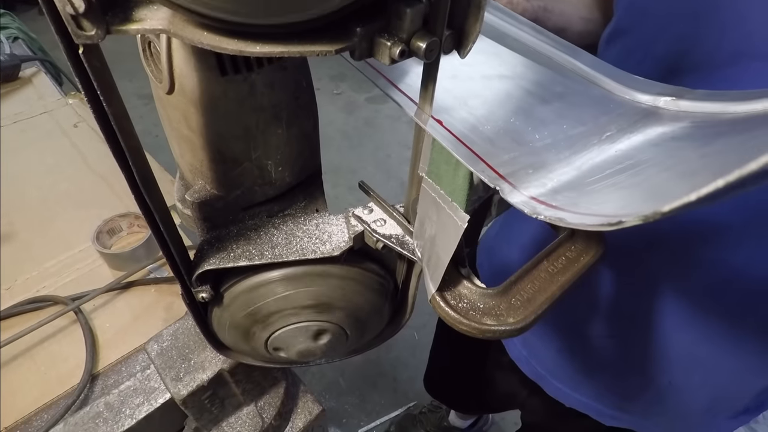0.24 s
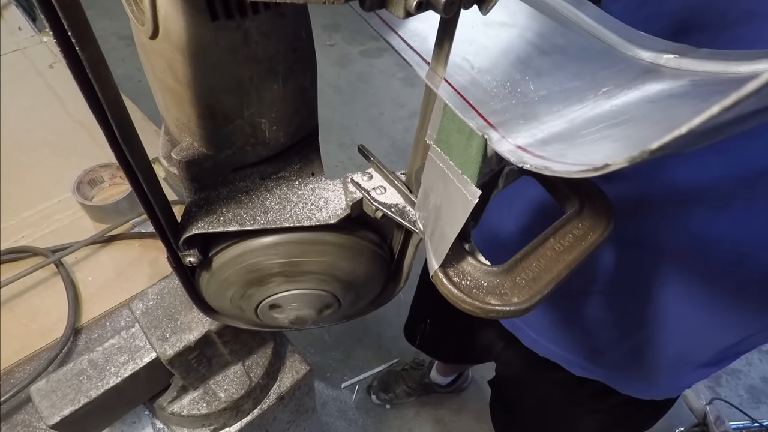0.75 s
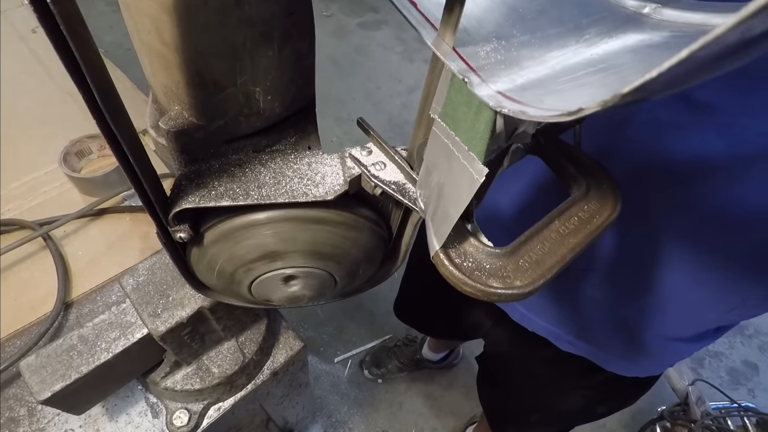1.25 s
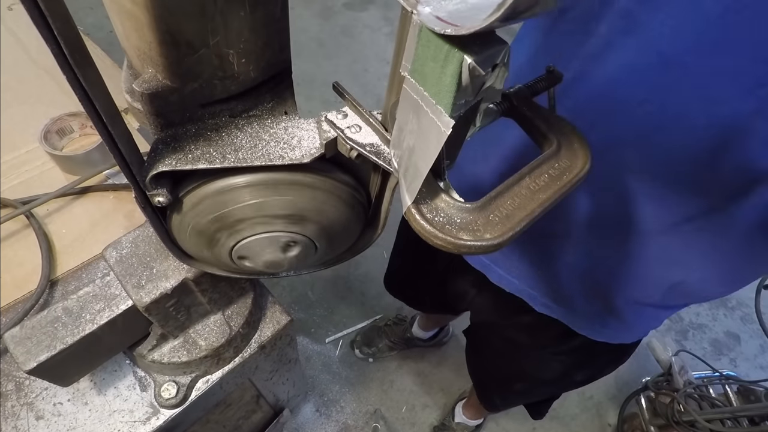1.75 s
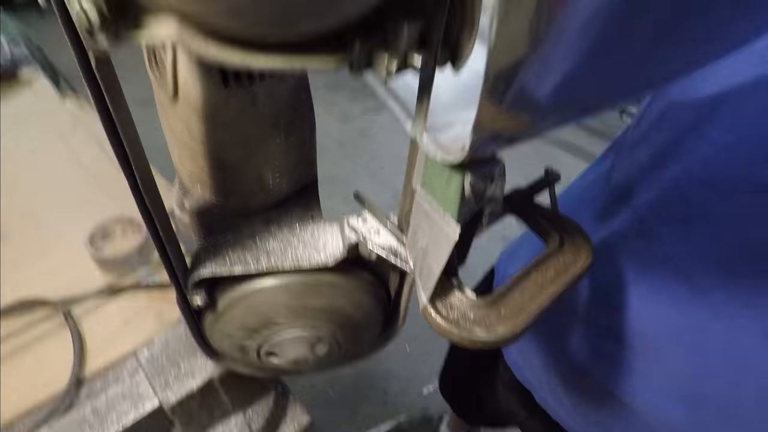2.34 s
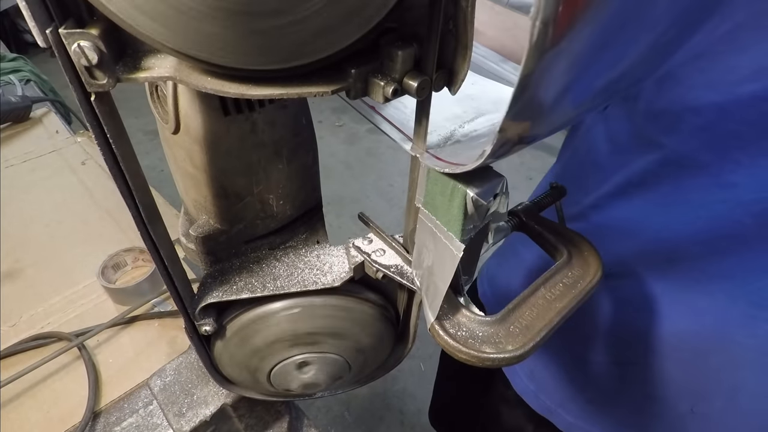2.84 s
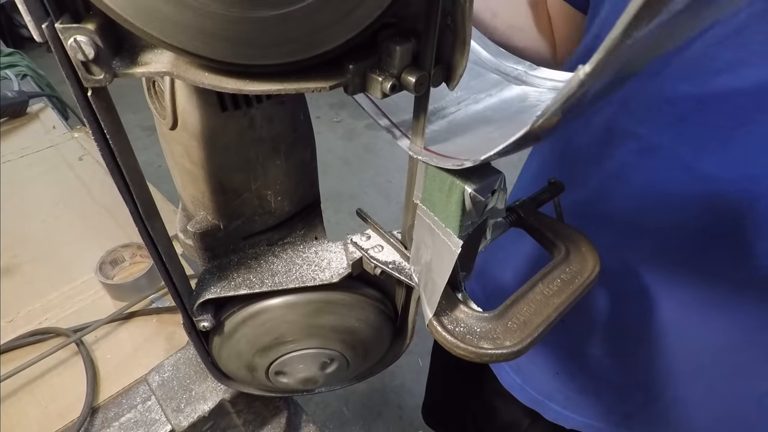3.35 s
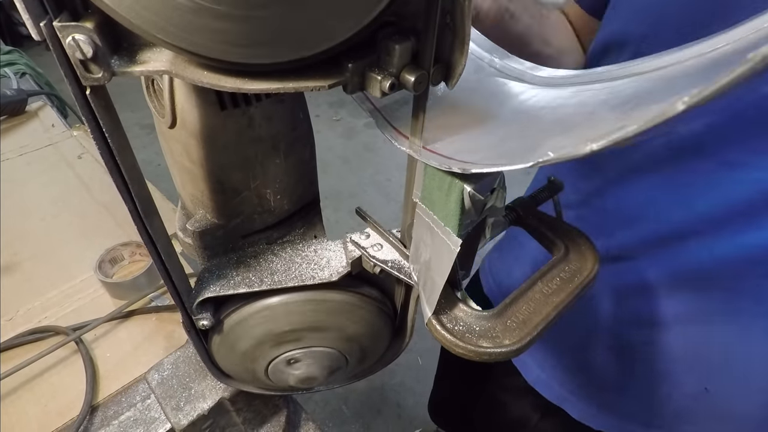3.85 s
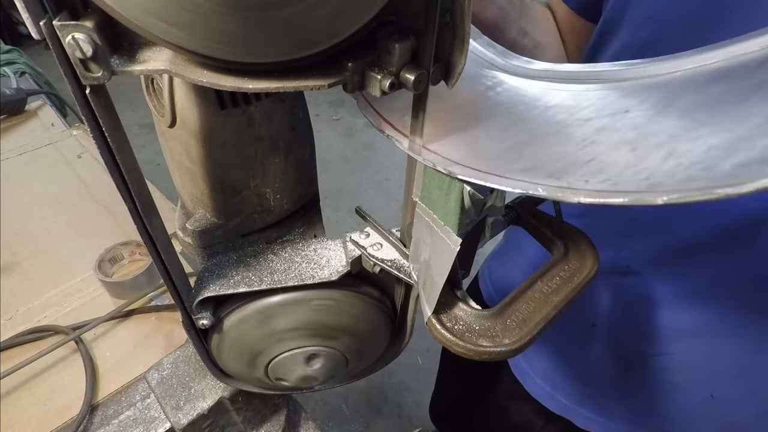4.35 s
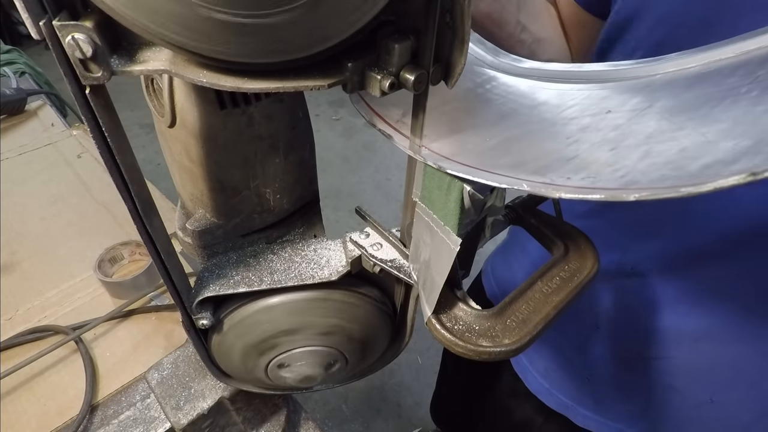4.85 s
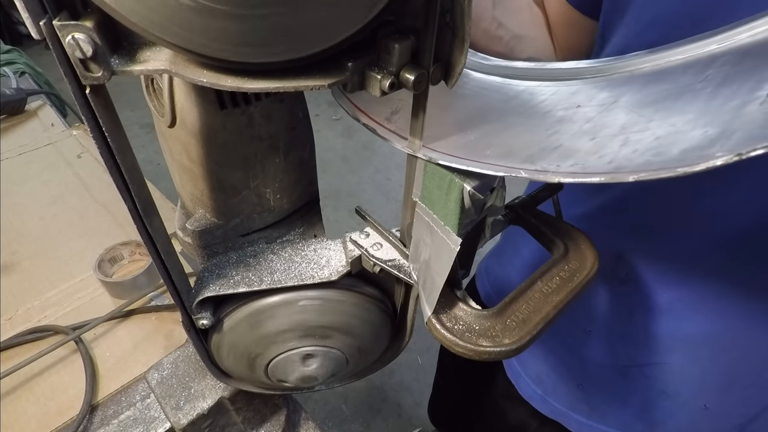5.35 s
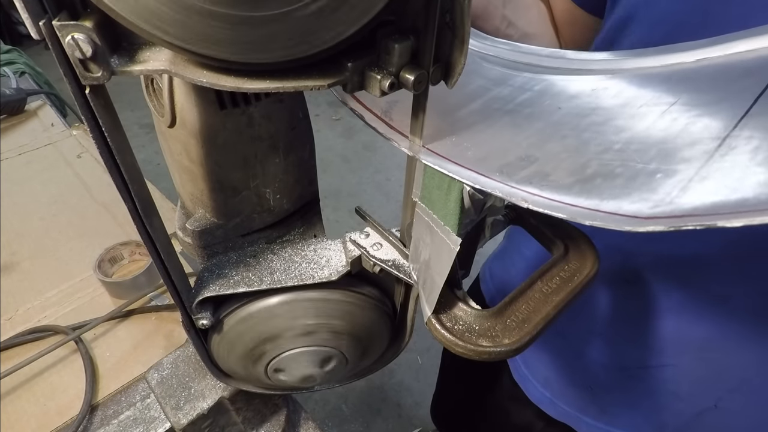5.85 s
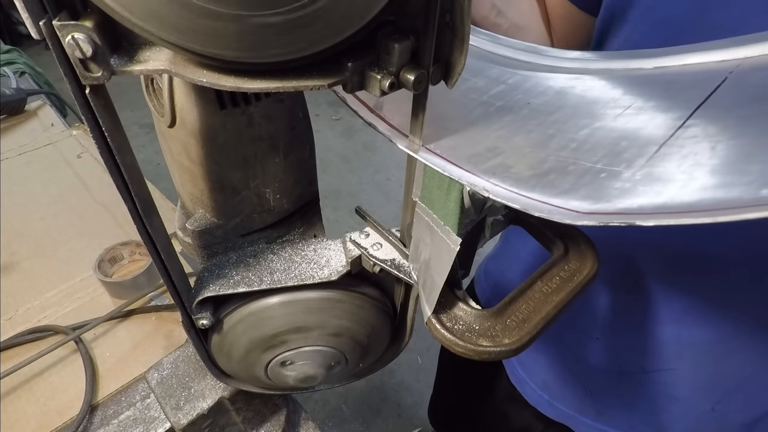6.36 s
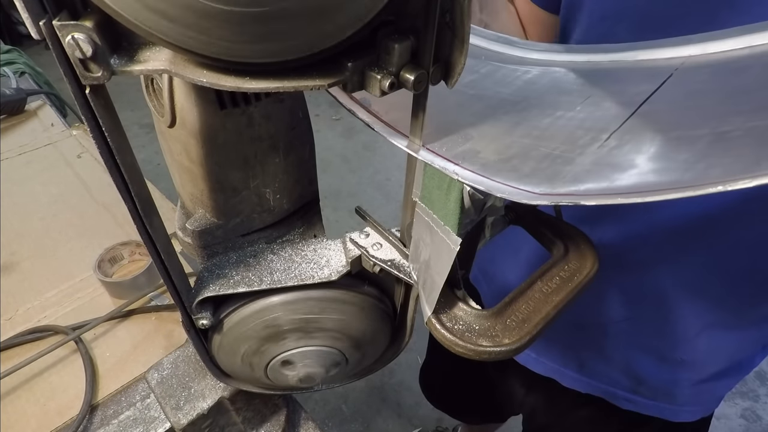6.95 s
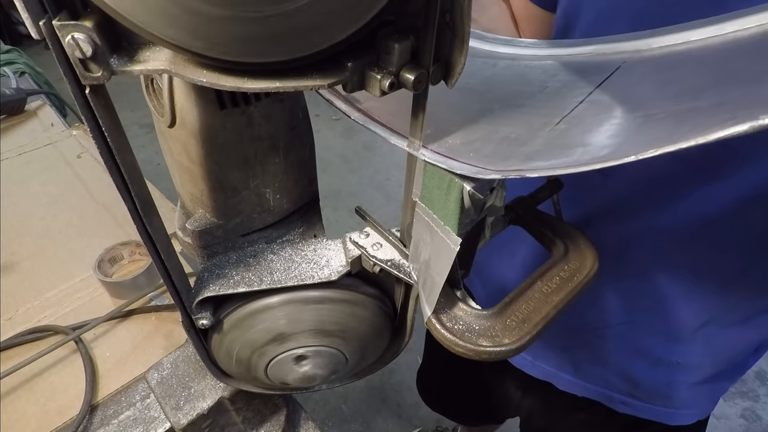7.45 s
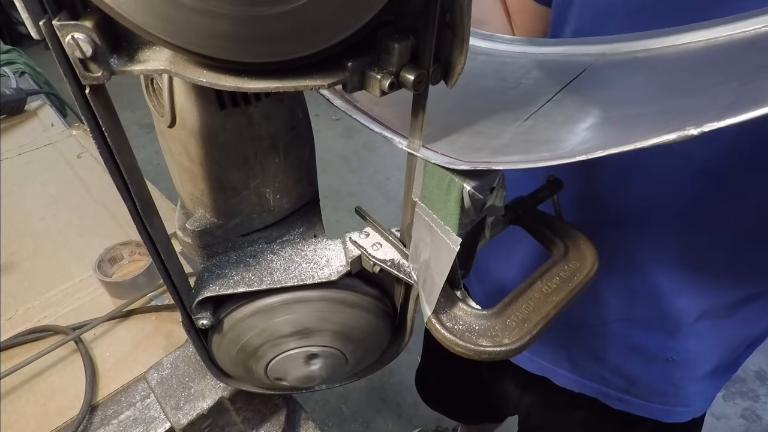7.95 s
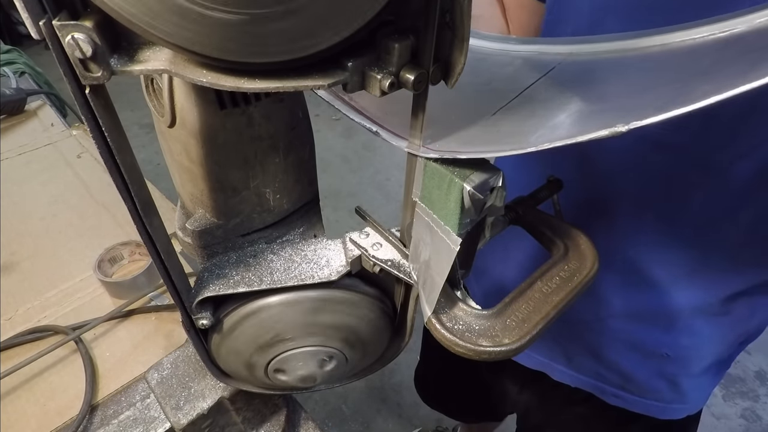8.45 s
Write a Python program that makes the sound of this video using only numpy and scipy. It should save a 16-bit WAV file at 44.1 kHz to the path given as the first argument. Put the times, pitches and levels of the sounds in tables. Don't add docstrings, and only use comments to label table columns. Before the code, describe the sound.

A band saw trims a curved metal sheet up close: harsh steady hiss, thin motor whine, a few dull bumps, brief metallic ringing.

```python
import sys
import numpy as np
from scipy import signal
from scipy.io import wavfile
from scipy.ndimage import uniform_filter1d

SR = 44100
rng = np.random.default_rng(int(sys.argv[2]) if len(sys.argv) > 2 else 0)


def boost(x):
    u = np.asarray(x, float) / 20
    return 10 ** u


def inscribe(sig):
    pcm = np.round(np.clip(np.atleast_2d(sig).T, -1, 1) * 32767)
    wavfile.write(sys.argv[1], SR, pcm.astype(np.int16))


N = 383669
SIZE, HOP, STEP = 1024, 256, 32
ONE_PORT_UNTIL = (2.62, 2.74)  # s, the second port fades in


def evened(x):
    return x / np.sqrt(np.mean(x ** 2) + 1e-20)


def read(points, hz):
    f, value = np.transpose(points)
    return np.interp(np.log(hz + 1), np.log(f + 1), value)


def ramp(t, t0, t1):
    return np.clip((t - t0) / (t1 - t0), 0, 1)


def spells(t, rows, fade_s=.05):
    return sum(size * ramp(t, t0, t0 + fade_s) * (1 - ramp(t, t1 - fade_s, t1)) for t0, t1, size in rows)


def wander(count, seconds):
    rows = rng.standard_normal((count, N // 1024 + 2))
    length = int(seconds * SR / 1024) + 1
    rows = uniform_filter1d(uniform_filter1d(rows, length), length)
    points = np.arange(0, N, STEP) / 1024
    return np.array([np.interp(points, np.arange(len(row)), evened(row)) for row in rows])


def patches(shape, bins, frames):
    bins, frames = max(int(bins), 1), max(int(frames), 1)
    field = uniform_filter1d(rng.standard_normal(shape), bins, -2)
    for _ in range(2):
        field = uniform_filter1d(field, frames, mode="wrap")
    return evened(field)


def two_ports(t):
    return ramp(t, *ONE_PORT_UNTIL)


# (pitch [Hz], left minus right [dB])
PORT_GAP = [(60, 6), (120, -3), (240, 9), (470, 8), (940, 0.5), (1880, 1), (3730, -1.5), (7430, 3.5),
            (14800, -5)]


def port_gap_db(hz):
    return read(PORT_GAP, hz)


# (change begins [s], change ends [s])
STAGES = [
    (1.54, 1.6),
    (2.68, 2.75),
]


def stage_changes(t):
    return [ramp(t, *stage) for stage in STAGES]


def staged(t, pressed, free, long):
    to_free, to_long = stage_changes(t)
    return pressed + (free - pressed) * to_free + (long - free) * to_long


def swings(rows):
    out, t = np.zeros(N), np.arange(SR // 4) / SR
    for s, db, hz, t60 in rows:
        swing = boost(db - 2.0 - 60 * t / t60) * np.sin(2 * np.pi * hz * t)
        part = out[round(s * SR):][:len(t)]
        part -= swing[:len(part)]
    return out


# (time [s], peak level [dB], pitch [Hz], minus for an outward push, t60 [s])
KNOCKS = [(1.51, -22, 540, 0.1), (1.516, -23, -110, .05), (1.5295, -12.5, 170, 0.03),
          (1.543, -24, -90, 0.04), (1.57, -22, -42, 0.12), (1.8885, -13, 160, 0.02),
          (1.9405, -15, 170, 0.012), (1.944, -18.5, -62, 0.06), (1.999, -25, 70, .05),
          (2.055, -27, 80, .04), (2.07, -25, -90, 0.04), (2.193, -21, 110, 0.04), (2.329, -20, 70, 0.05),
          (2.343, -21, -65, .05), (2.359, -22.5, 105, 0.06), (2.382, -25, 85, .06), (2.407, -28, -80, .04),
          (2.437, -28, 80, 0.042)]


def knocks():
    return swings(KNOCKS)


# (from [s], to [s],
# level change [dB])
RUMBLE_SHIFTS = [(.1, .3, -4), (.5, .64, 6), (.9, 1.451, 0), (2.62, 3.2, -4), (2.7, 3.05, -2.5), (3.28, 3.5, 2),
                 (3.65, 4.0, 2.5), (4.2, 4.5, 3), (4.5, 4.72, -3), (4.88, 5.2, 5.5), (5.28, 5.42, -6),
                 (5.95, 6.2, 1), (6.75, 7.02, 3), (7.25, 7.9, 5), (7.98, 8.9, 4)]


def shake_db(t, feed_db):
    steady_db = feed_db + staged(t, pressed=-13.5, free=-22, long=-26.5)
    power = boost(steady_db + spells(t, RUMBLE_SHIFTS, fade_s=0.11)) ** 2
    aftershake_db, aftershake_t60 = -20.5, 0.49
    for s, db, _, _ in KNOCKS:
        fall_db = 60 * np.maximum(t - s, 0) / aftershake_t60
        power += (t >= s) * boost(db + aftershake_db - fall_db) ** 2
    return 10 * np.log10(power)


# (peak time [s], half length [s], rise [Hz])
EASES = [(.02, .3, 3.2), (.4, .75, 1.1), (1.79, .2, 1.7), (1.98, .05, 1.2), (4.17, .05, 2), (6.8, .08, 1),
         (.52, .14, 2.2), (.9, .3, 1.7), (1.47, .15, 2.2), (1.7, .17, 3.6), (1.9, .17, 3.2),
         (2.77, .21, 6.2), (3.08, .17, 2.2), (3.61, .13, 3), (3.87, .15, 2.2), (4.1, .15, 4.2),
         (4.41, .1, 1.5), (4.58, .13, 4), (4.81, .14, 2.6), (5.03, .1, -3.4), (5.15, .09, 3.4),
         (5.31, .12, 4), (5.65, .14, 2.6), (5.91, .13, 3.8), (6.72, .22, 4), (7.35, .4, -.5),
         (7.9, .22, 1.3), (8.6, .16, -1.6)]


def shaft_angle(t, fine):
    loaded_hz = 297.9
    speed = loaded_hz + sum(rise * np.maximum(1 - abs(t - s) / half, 0) for s, half, rise in EASES)
    return 2 * np.pi * np.cumsum(np.interp(fine, t, speed)) / SR


WHINES = (1, 9, 15)
# (pressed level [dB], free level [dB], long cut level [dB])
WHINE_DB = [(-46.5, -47.5, -60.5), (-39.5, -47, -41), (-46.5, -34, -39)]
# (from [s], to [s], level change [dB])
SWELLS = [
    [(-.2, .52, 5), (1.55, 1.9, -2.5), (4.38, 4.8, -4), (7.22, 8.32, 4.5)],
    [(-.2, .3, -2.5), (.45, .68, 1.5), (1.1, 1.42, 0.5), (1.54, 1.63, -1), (1.64, 1.93, 6.5),
     (2.14, 2.32, 5), (2.32, 2.44, -4), (2.6, 2.7, -8), (2.72, 2.98, -3.5), (2.96, 3.5, -4), (4.18, 4.3, 0),
     (3.52, 3.72, 3), (5.18, 5.42, -2.5), (6.6, 6.84, 1.5), (6.84, 7.1, 0), (8.3, 8.36, -6),
     (4.93, 5.14, -3), (5.4, 5.66, -1.5), (4.34, 4.76, -1), (5.98, 6.26, 0), (7.3, 8.0, 0.5),
     (8.09, 8.33, 2)],
    [(-.2, .12, 5.5), (.4, .92, -2), (1.0, 1.38, 1), (1.83, 2.14, -7), (2.375, 2.475, -24), (4.12, 4.22, 2),
     (4.22, 4.32, -4), (5.9, 6.22, 1.5), (7.88, 8.1, -0.5), (2.7, 2.98, -5), (4.93, 5.11, -2),
     (5.4, 5.56, 0), (6.22, 6.76, -1), (6.78, 7.72, -5), (6.95, 7.3, -9), (7.7, 8.9, -2), (8.23, 8.47, 0.5),
     (8.47, 8.9, 0)],
]


def whine_levels(t, angle):
    gain = {}
    for k, stage_db, swells in zip(WHINES, WHINE_DB, SWELLS):
        gain[k] = boost(staged(t, *stage_db) + spells(t, swells, fade_s=0.027))
    wheel_per_turn = .05965
    depth = staged(t, pressed=.15, free=.25, long=.36)
    gain[9] = gain[9] * (1 + depth * np.cos(wheel_per_turn * angle - .2))
    return gain


# (from [s], to [s], share of a half turn [0-1])
OPPOSED = [
    [(2.72, 3.15, 0.62), (4.4, 5.05, .5), (5.35, 5.47, 0.5), (5.85, 6.2, 0.7), (6.72, 6.9, 0.6),
     (8.3, 8.5, 0.3)],
    [(2.7, 8.9, .17), (3.0, 3.5, .15), (3.19, 3.5, .48), (3.8, 3.9, .25), (4.08, 4.18, .25),
     (4.36, 5.66, .22), (4.55, 4.62, .55), (4.73, 5.14, .4), (5.2, 5.38, .1), (5.35, 5.62, .2),
     (5.76, 5.94, .12), (6.04, 6.07, .6), (6.14, 6.16, .6), (6.22, 7.33, .25), (6.24, 6.6, .3),
     (6.4, 6.58, .12), (6.85, 7.09, .25), (7.9, 8.9, .2), (8.0, 8.11, .6), (8.31, 8.9, .38),
     (8.44, 8.9, .22)],
    [(2.7, 8.9, .18), (3.54, 5.58, .3), (4.46, 4.56, -.2), (4.62, 4.92, .2), (4.98, 5.46, .27),
     (5.02, 5.2, .22), (5.46, 5.58, -.12), (5.86, 5.95, .15), (6.24, 6.68, .3), (6.31, 6.61, .36),
     (6.8, 8.9, .3), (7.98, 8.26, .18), (8.09, 8.26, .3), (8.26, 8.45, -.33), (8.45, 8.9, .33)],
]


def whine_lags(t):
    return {k: np.pi / 2 * spells(t, rows, fade_s=0.0037) for k, rows in zip(WHINES, OPPOSED)}


GEARS = [12, 19.03, 19.47, 21.28, 16.36, 27.1, 30, 31.4, 32.19, 35.35, 45]
GEARS_DB = [-53, -52, -50.5, -51, -60, -59, -57, -58, -57.5, -63, -80]


def gear_levels(t, drifts):
    muffle_db = -9 * (1 - ramp(t, 0.99, 1.6))
    return {k: boost(db + drift + muffle_db) for k, db, drift in zip(GEARS, GEARS_DB, drifts)}


# (multiple of tooth rate [ratio], level [dB])
TEETH_DB = [(2, -71), (3, -68), (4, -67), (5, -61.5), (6, -56.5), (8, -58.5), (9, -51.5)]
# (from [s], to [s], multiple of tooth rate [ratio], level [dB])
BITES = [(.3, .72, 4, -41.5), (.66, 1.02, 4, -36), (0, .5, 2, -45), (.52, .7, 2, -40), (1.07, 1.18, 3, -37),
         (.7, 1.1, 5, -43), (0, .25, 6, -44), (.7, 1.45, 9, -44), (.2, .6, 8, -46), (3.25, 3.75, 3, -51),
         (2.7, 3.02, 2, -58), (4.1, 4.38, 2, -66), (4.2, 4.32, 6, -49), (2.82, 3.16, 9, -51),
         (5.47, 5.6, 6, -47), (7.08, 7.22, 6, -57)]


def tooth_levels(t, drifts):
    teeth = {round(k): boost(db + drift) for (k, db), drift in zip(TEETH_DB, drifts)}
    for t0, t1, k, db in BITES:
        teeth[round(k)] = teeth[round(k)] + boost(db) * np.sin(np.pi * ramp(t, t0, t1)) ** .5
    teeth_per_turn = .8722
    return {k * teeth_per_turn: g for k, g in teeth.items()}


WHINE_FLUTTER = {1: 2, 9: 1.1, 15: 1.4}


def motor(flutter_db=3.0, fade_db=3.0):
    t, fine = np.arange(0, N, STEP) / SR, np.arange(N) / SR
    angle = shaft_angle(t, fine)
    come_and_go = fade_db * wander(count=18, seconds=.07)
    gain = whine_levels(t, angle[::STEP])
    gain.update(gear_levels(t, come_and_go))
    gain.update(tooth_levels(t, come_and_go[::-1]))
    lags = whine_lags(t)
    quick = wander(count=42, seconds=.012)
    slow = wander(count=42, seconds=.2) * two_ports(t)
    out = np.zeros((2, N))
    for i, (k, g) in enumerate(gain.items()):
        slip, apart = (0.78, 0.096) if k in lags else (1.1, 1.1)
        lag = lags.get(k, 0)
        side = apart * np.median(g[len(t) // 2:]) * (.5 * slow[2 * i] + 1j * slow[2 * i + 1])
        side = side + 1j * g * np.sin(lag)
        middle = g * np.cos(lag)
        flutter = boost(WHINE_FLUTTER.get(k, flutter_db) * quick[2 * i + 1])
        waver = np.sqrt(2) * flutter * np.exp(1j * slip * quick[2 * i])
        swing = waver * np.array([middle + side, middle - side])
        swing = np.array([np.interp(fine, t, port) for port in swing])
        out += (swing * np.exp(1j * k * angle)).imag
    return out


# (time [s], peak level [dB], pitch [Hz], t60 [s])
PINGS = [(1.5474, -26, 2170, .04), (1.9689, -28, 2070, .08), (2.108, -22, 3730, .08),
         (2.553, -25, 3660, .08), (2.582, -25, 3660, .08), (2.6559, -24, 1650, .05), (2.7, -27, 1620, .05),
         (3.002, -27, 2380, .08), (3.062, -30, 2370, .12), (4.0008, -28, 2700, .03),
         (5.014, -27, 5990, .02), (5.555, -30, 1560, .08), (6.8335, -22, 7000, .008),
         (7.5055, -20, 3000, .012), (8.5375, -27, 6010, .02)]


def pings():
    return swings(PINGS)


# (pitch [Hz], t60 [s])
SNAG_MODES = [(2300, 0.042), (3300, 0.0092), (3900, 0.0097), (6000, 0.0086), (7200, 0.0045)]


def snags(per_s=60, level_db=-47, spread_db=3.0):
    t, out = np.arange(SIZE) / SR, np.zeros((2, N))
    for hz, t60 in SNAG_MODES:
        force = boost(spread_db * np.minimum(rng.exponential(1, (2, N)), 2.5))
        hits = force * (rng.random((2, N)) < per_s / SR)
        mode = boost(-60 * t / t60) * np.sin(2 * np.pi * hz * t)
        out += signal.oaconvolve(hits, mode[None], axes=1)[:, :N]
    return boost(level_db) * evened(out)


# (from [s], to [s], start pitch [Hz], end pitch [Hz], level [dB])
RINGS = [(0, 0.105, 700, 770, -34), (.07, .21, 785, 710, -33.5), (0.19, 0.472, 738, 725, -32),
         (.43, .52, 670, 780, -38.5), (0.535, 0.637, 722, 712, -34), (.82, 1.03, 490, 432, -36),
         (1.102, 1.295, 405, 385, -40), (0.47, .54, 1410, 1400, -33.5), (.6, 0.89, 1450, 1450, -37),
         (0.698, 1.549, 2225, 2200, -43), (0.969, 1.32, 3230, 3160, -40), (1.9, 2.2, 2120, 2084, -43),
         (1.281, 2, 3120, 2800, -44), (0.492, 0.575, 292, 247, -39), (2.073, 2.156, 1630, 1630, -40),
         (2.05, 2.55, 3590, 3600, -40), (2.4, 2.68, 3620, 4400, -43), (1.0, 1.9, 11000, 11000, -59),
         (1.852, 3.1, 8100, 8900, -47), (2.817, 3.162, 2200, 3000, -47), (3.042, 3.45, 7560, 6990, -36.5),
         (4.153, 4.42, 2420, 2330, -44), (4.952, 5.249, 3420, 2900, -42), (5.42, 5.62, 2350, 2350, -45),
         (6.15, 6.448, 1780, 1700, -45), (6.193, 6.56, 3230, 3230, -43), (6.42, 6.6, 3670, 3650, -39.5),
         (7.302, 7.656, 2260, 2240, -43), (7.42, 7.622, 2330, 2300, -39), (7.657, 7.896, 2100, 2000, -43.5),
         (6.968, 7.05, 3010, 2990, -38), (8.083, 8.306, 3090, 3090, -45), (.05, .22, 1500, 1500, -43),
         (.08, 0.224, 590, 940, -41), (3.56, 3.8, 4400, 5500, -44), (3.87, 4.0, 5200, 3100, -42),
         (4.3, 4.6, 3580, 5300, -43), (7.17, 7.42, 3620, 3600, -43), (7.76, 7.98, 3600, 2240, -44),
         (2.6, 2.73, 1630, 1620, -46)]


def rings(fade=0.22):
    out = np.zeros((2, N))
    for t0, t1, hz0, hz1, db in RINGS:
        n = round((t1 - t0) * SR)
        width_hz = 11 + 0.017 * hz0
        r = np.exp(-1.7 * np.pi * width_hz / SR)
        noise = rng.standard_normal((2, n + SIZE)) + 1j * rng.standard_normal((2, n + SIZE))
        slow = signal.lfilter([1], [1, -2 * r, r * r], noise)
        hold = 1500 / (hz0 + 200)
        glide = np.exp(2j * np.pi * np.cumsum(np.linspace(hz0, hz1, n)) / SR)
        tone = ((slow[:, -n:] / slow.std() + hold) * glide).real
        pan_db = port_gap_db(hz0) * two_ports(t0)
        gain = boost(db + np.array([[pan_db], [-pan_db]]) / 2)
        out[:, round(t0 * SR):][:, :n] += gain * evened(tone) * signal.windows.tukey(n, fade)
    return out


# (time [s], level [dB])
FEED = [(0, -32.5), (.95, -32), (1.1, -31), (1.5, -29.5), (1.6, -29), (1.7, -30), (1.92, -29), (2.0, -31.5),
        (2.2, -31.5), (2.35, -31), (2.76, -30), (2.9, -29), (3.22, -30.5), (3.6, -28.5), (4.66, -29),
        (5.25, -29), (7.1, -29), (8.7, -29)]


def bite_db(t):
    return np.interp(t, *np.transpose(FEED))


# (from [s], to [s], level change [dB])
DRUM_SHIFTS = [(4.1, 4.6, -0.5), (.5, 0.716, 0.5), (1.024, 1.62, -6), (1.2, 1.477, 0), (1.5, 1.692, -9.5),
               (1.985, 2.1, -6), (2.67, 3.3, -2)]


def drum_db(t, feed_db):
    return feed_db + staged(t, pressed=2, free=-6, long=-13) + spells(t, DRUM_SHIFTS, fade_s=0.14)


# (from [s], to [s], level change [dB])
CLOGS = [(-.5, 0.558, -4.5), (-.2, .17, -7), (.98, 1.74, -9), (1.44, 1.73, -17), (1.94, 2.156, -17),
         (2.84, 3.2, -3)]


def fizz_db(t, feed_db):
    return feed_db + staged(t, pressed=-23, free=-21.5, long=-23.5) + spells(t, CLOGS, fade_s=0.1)


# (pitch [Hz], level [dB per Hz])
PRESSED = [(30, -19), (100, -4), (250, -7.5), (420, 4.5), (750, 3.5), (1200, 0.5), (1900, -7.5),
           (3000, -16.5), (4200, -14.5), (6000, -17.5), (8000, -18), (9900, -34), (11300, -44),
           (15300, -43)]
# (pitch [Hz], level [dB per Hz])
FREE = [(30, -18), (100, -9), (250, -11.5), (420, -18.5), (750, -11.5), (1200, -11.5), (1900, -6),
        (3000, -5), (4200, 1), (6000, -9.5), (8000, -8), (9900, -19), (11300, -29), (15300, -21)]
# (pitch [Hz], level [dB per Hz])
LONG = [(30, -19), (100, 8.5), (250, -6.5), (420, -15), (750, -4), (1200, -2.5), (1900, -5), (3000, -5),
        (4200, -5), (6000, -4.5), (8000, -5.5), (9900, -13), (11300, -21.5), (15300, -29.5)]
# (pitch [Hz], width [Hz], level [dB])
BODY = [(894, 127, 6.5), (1710, 470, 3.5), (2300, 47, -7), (3237, 130, 4.5), (3640, 380, 1.5),
        (5880, 640, 5.5), (5950, 86, -4.5), (6220, 100, 4), (7160, 750, 4), (4830, 1400, -1.5),
        (1273, 420, -6), (106, 35, 8.5)]


def cut_colour_db(hz, t):
    free, long = stage_changes(t)
    colour_db = np.outer(read(PRESSED, hz), 1 - free)
    colour_db += np.outer(read(FREE, hz), free - long)
    colour_db += np.outer(read(LONG, hz), long)
    body_db = sum(db / (1 + (2 * (hz - f) / w) ** 2) for f, w, db in BODY)
    return colour_db + np.outer(body_db, .35 + .65 * free)


# (level counted from [Hz], to [Hz], lift acts from [Hz], to [Hz])
BANDS = [
    (2000, 9000, 2200, 9500),
    (30, 200, 30, 150),
    (350, 1300, 400, 1100),
    (11600, 15000, 11800, 16000),
]


def lift_db(hz, t, colour_db):
    feed_db = bite_db(t)
    wanted = [feed_db, shake_db(t, feed_db), drum_db(t, feed_db), fizz_db(t, feed_db)]
    lifts, edges = [], []
    for (lo, hi, start, stop), want_db in zip(BANDS, wanted):
        inside = (hz >= lo) & (hz < hi)
        have_db = 10 * np.log10((boost(colour_db[inside]) ** 2).sum(0))
        lifts += 2 * [want_db - have_db]
        edges += [start, stop]
    order = np.argsort(edges)
    weights = np.array([read(np.c_[np.sort(edges), order == k], hz) for k in range(len(edges))])
    return weights.T @ np.array(lifts)


def cut(streak_db=1.8, blot_db=1.2, flicker_db=.65, swell_db=.2):
    frames, hz = N // HOP + 5, np.fft.rfftfreq(SIZE, 1 / SR)
    t = np.arange(frames) * HOP / SR
    colour_db = cut_colour_db(hz, t)
    colour_db += lift_db(hz, t, colour_db)
    shape = (2, len(hz), frames)
    field_db = colour_db + streak_db * patches(shape, 3, 32) + blot_db * patches(shape, 8, 12)
    field_db += flicker_db * patches((1, frames), 1, 2) + swell_db * patches((1, frames), 1, 8)
    field_db += np.outer([.5, -.5], port_gap_db(hz))[:, :, None] * two_ports(t)
    z = (rng.standard_normal(shape) + 1j * rng.standard_normal(shape)) * boost(field_db)
    return signal.istft(z, nperseg=SIZE, noverlap=SIZE - HOP)[1][:, :N]


def scene():
    return cut() + motor() + rings() + knocks() + pings() + snags()


# (from [Hz], to [Hz], from [s], to [s], turn [rad])
TURNED = [(1430, 1950, 0, .08, 2.85), (1400, 2080, .08, .16, 2.85), (1370, 1800, .16, .42, 2.85),
          (1750, 2050, .21, .3, 2.5), (1400, 2240, .28, .4, 2.8), (2150, 2260, .4, .52, 2.5),
          (1580, 1960, .4, .53, 2.75), (1780, 1920, .53, .6, 2.5), (1690, 1810, .01, .1, np.pi),
          (1590, 1860, .06, .165, 3.1), (1550, 1680, .16, .4, np.pi), (1600, 1800, .25, .285, 3.1),
          (1600, 2010, .33, .4, np.pi), (1750, 1870, .4, .52, 3.1), (2880, 3100, 0, .08, -2.2),
          (3100, 3680, 0, .82, -2.3), (2900, 3100, .49, .6, -2), (3380, 3500, .52, .68, -.8),
          (3130, 3450, .8, .92, -2.3), (5430, 5950, 0, .3, 2.2), (5720, 6000, 0, .49, 2),
          (7900, 8750, 0, .12, -2.8), (8250, 8600, 0, .25, -2.8), (9200, 9700, 0, .23, .55),
          (10200, 10900, 0, .2, .5), (4050, 4400, 0, .07, 1), (6900, 7150, 0, .07, 1)]


def phase_turn(ragged_hz, t):
    turn = np.zeros(ragged_hz.shape)
    for lo, hi, t0, t1, radians in TURNED:
        turn[(ragged_hz > lo) & (ragged_hz < hi) & (t >= t0) & (t < t1)] = radians
    return turn


# (from [s], to [s])
TOP_SHARED = [(0, .06), (1.55, 1.68), (2, 2.04)]


def own_share(hz, t):
    top_apart = ~np.any([(t >= t0) & (t < t1) for t0, t1 in TOP_SHARED], 0)
    return np.maximum(two_ports(t), np.outer(hz > 11400, top_apart))


def starved(hz, t):
    middle = (hz > 2500) * (hz < 5200) * (abs(hz - 2690) > 130) * (abs(hz - 4490) > 130)
    thin = np.maximum(1.25 * ramp(hz, 10000, 11200), .19 * middle)
    first = np.outer(hz > 11300, 2.5 * (1 - ramp(t, .05, .25)))
    return np.outer(thin, t > ONE_PORT_UNTIL[1]) + first


# (time [s], level [dB], recovery [s])
DUCKS = [(1.953, -13, .012), (1.955, -2, .06), (1.557, -3, .04), (2.13, -2, .03)]


def limiter_db(t):
    return sum(db * ramp(t, s - .002, s) * np.exp(-np.maximum(t - s, 0) / back) for s, db, back in DUCKS)


def roll_off(x):
    return signal.sosfilt(signal.butter(12, 15390, fs=SR, output="sos"), x)


def record(dry):
    hz, t, (left, right) = signal.stft(dry, SR, nperseg=SIZE, noverlap=SIZE - HOP)
    ragged_hz = hz[:, None] + 22 * patches((1, len(t)), 1, 2)
    own = own_share(hz, t)
    copied = left * np.exp(-1j * phase_turn(ragged_hz, t))
    z = np.array([left, np.sqrt(1 - own ** 2) * copied + own * right])
    chance = patches(left.shape, 7, 5) + .3 * patches(z.shape, 4, 5)
    z *= chance * starved(hz, t) < .45
    z *= ragged_hz < np.where(t < ONE_PORT_UNTIL[1], 15330, 15150)
    x = signal.istft(z, nperseg=SIZE, noverlap=SIZE - HOP)[1][:, :N]
    t = np.arange(N) / SR
    throb = 1 + .075 * np.cos(2 * np.pi * 187.5 * t)
    x = x * boost(limiter_db(t)) * throb
    x /= (1 + (x / .2) ** 4) ** .25
    return roll_off(x)


dry = scene()
out = record(dry)
inscribe(out)
```